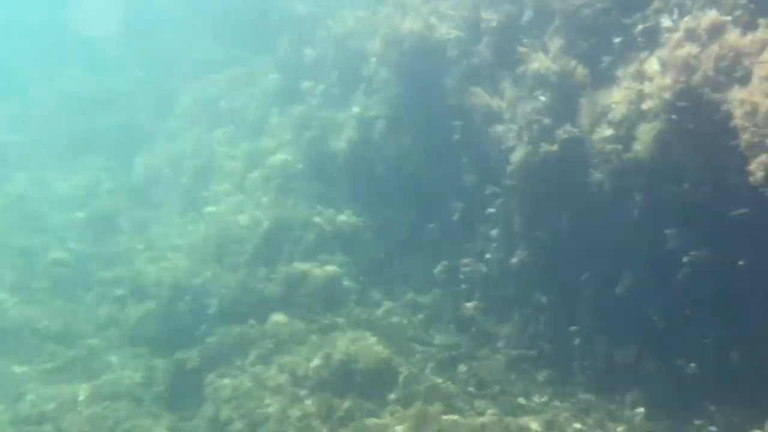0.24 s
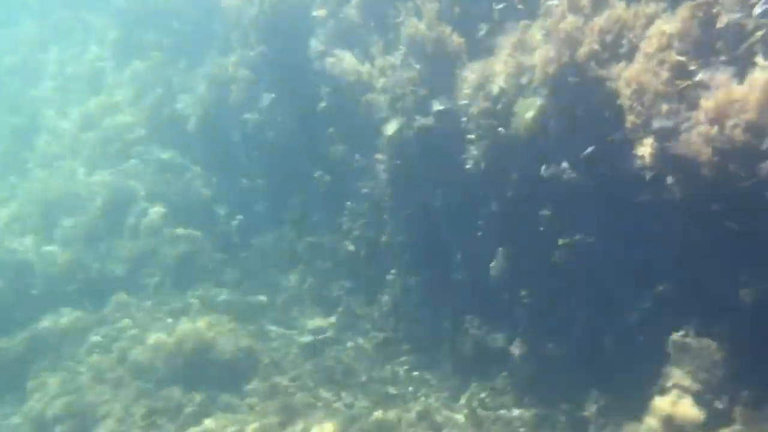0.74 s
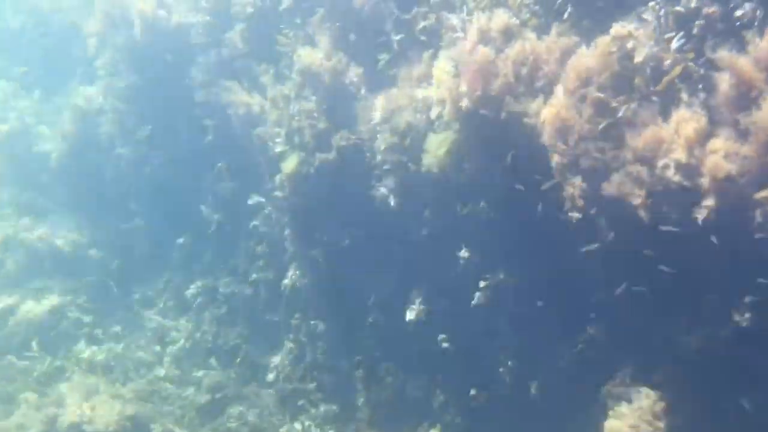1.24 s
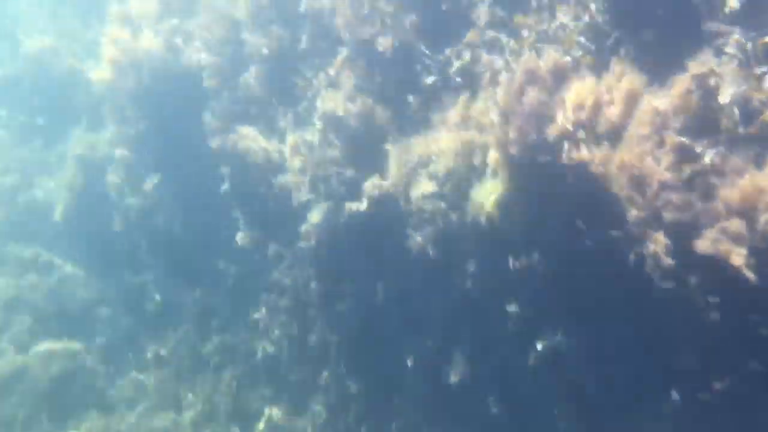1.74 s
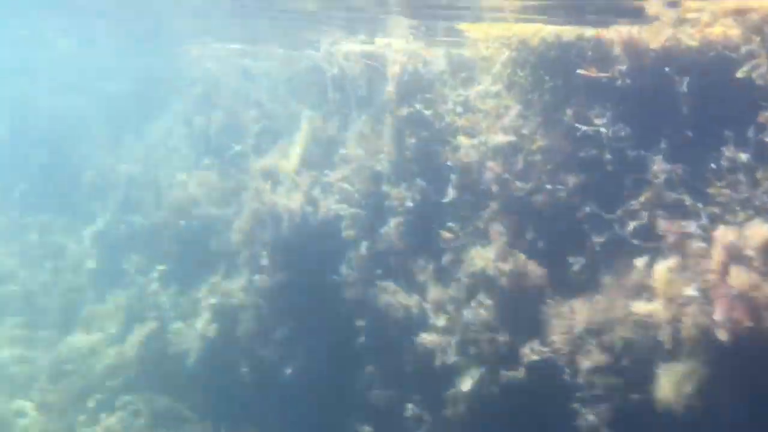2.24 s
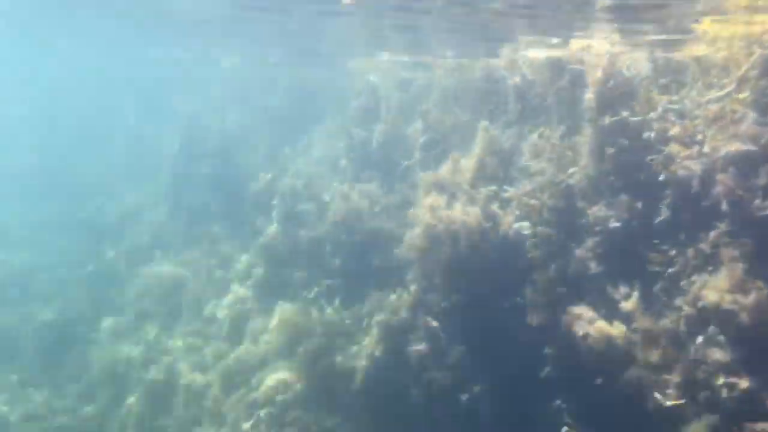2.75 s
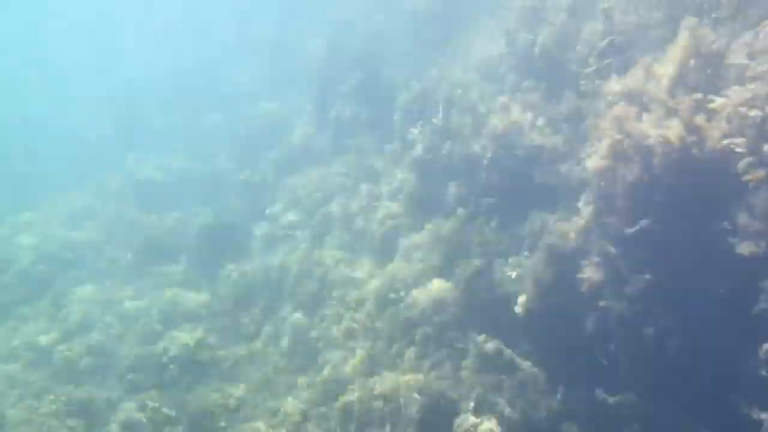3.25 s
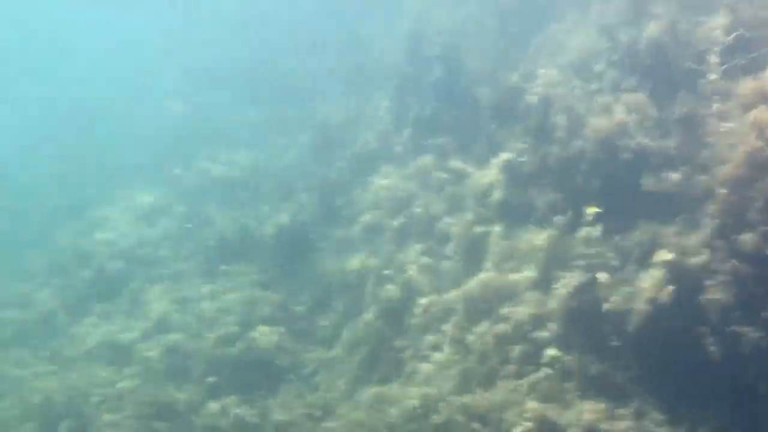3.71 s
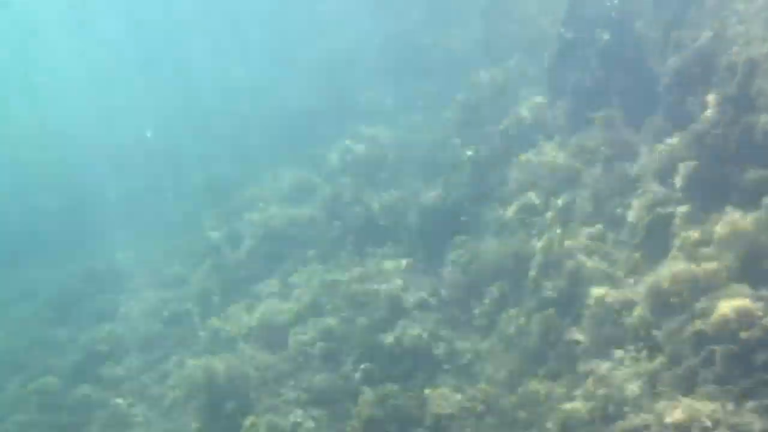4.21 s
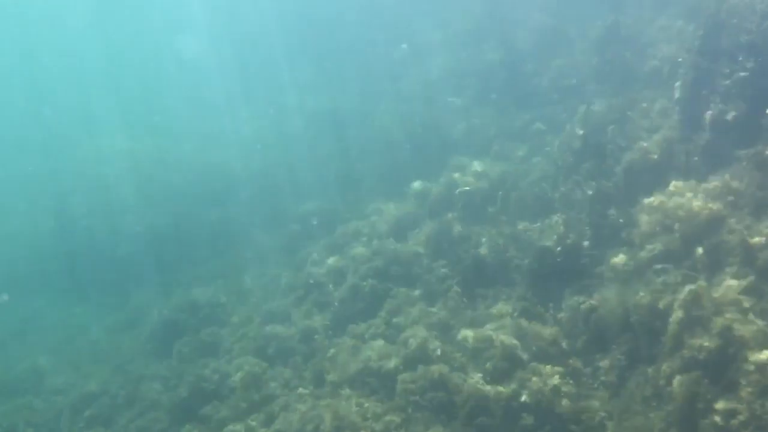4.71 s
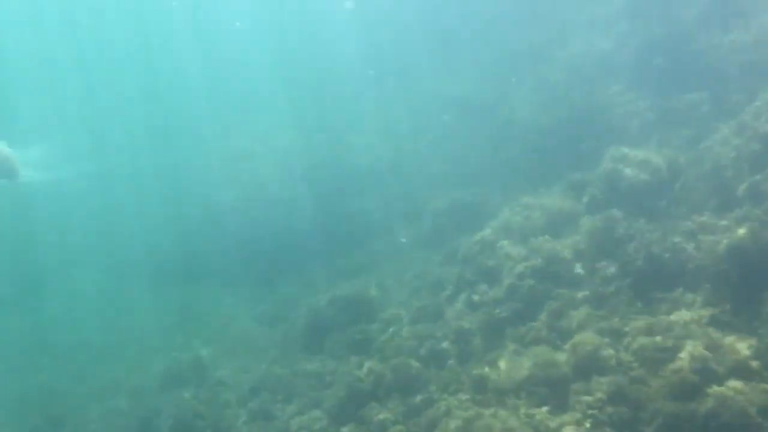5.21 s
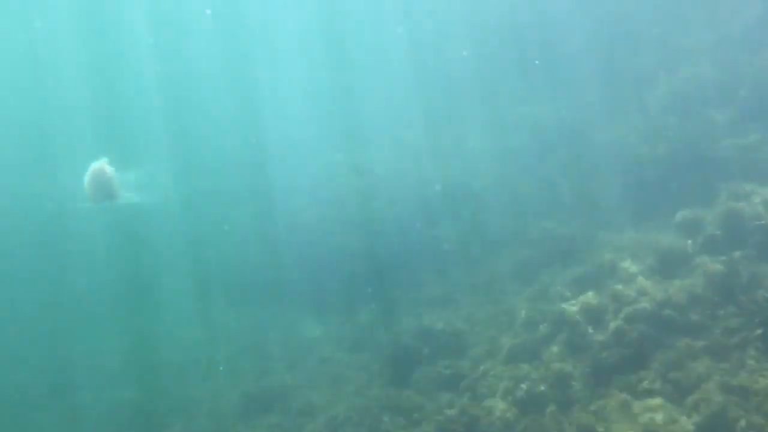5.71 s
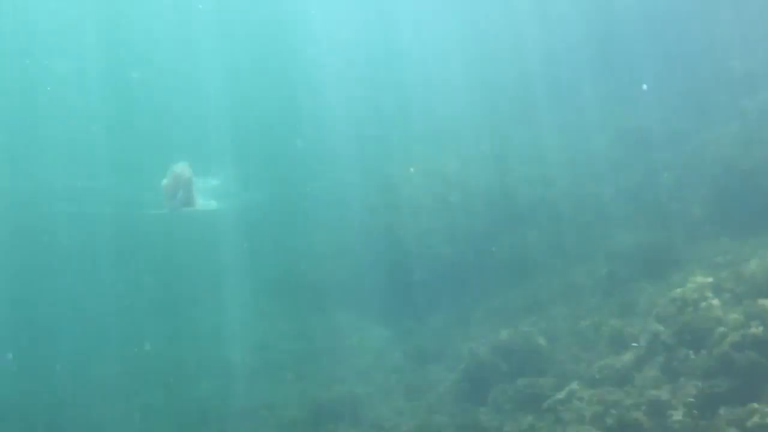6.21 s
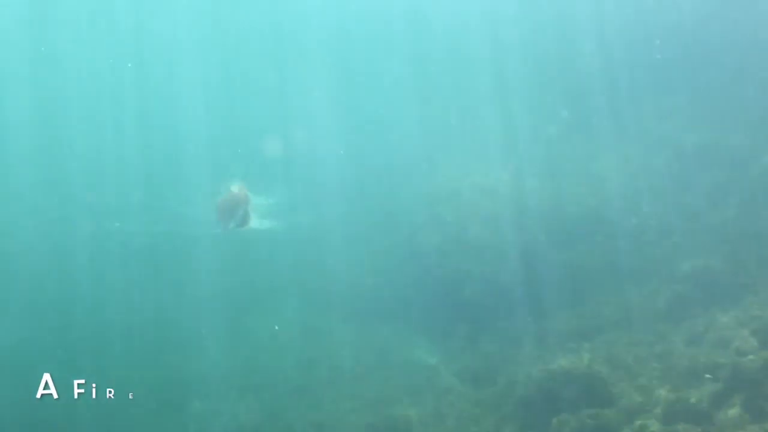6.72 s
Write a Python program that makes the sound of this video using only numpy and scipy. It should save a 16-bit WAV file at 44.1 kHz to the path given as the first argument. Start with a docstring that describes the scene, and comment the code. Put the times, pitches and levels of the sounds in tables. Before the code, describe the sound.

Underwater near a weedy rocky slope, heard from inside a sealed camera housing. Irregular dull low thumps come singly and in clusters over a deep wavering rumble and soft low rush. Faint plasticky ticks and tiny short bubble blips are scattered on top. The strongest knocks fall in the first second or so and around four seconds; after five it grows much calmer. Close, muffled, with very faint hiss.

```python
"""Just under the sea surface, heard from inside a sealed camera housing.
Swirling water nudges the housing: low notes that swell and die make strong thumps, random pushes small ones.
Flow noise makes a deep surge and a rush, and keeps the shell humming in its resonances.
Something small ticks against the shell, with a bounce after each tick, and bubbles ring as short dying notes.
The microphone adds a faint hiss and a very weak, thin tone, and the top of the treble is cut off."""
import sys
import numpy as np
from scipy import signal
from scipy.fft import rfft, irfft
from scipy.io import wavfile

SR = 44100
rng = np.random.default_rng(int(sys.argv[2]) if len(sys.argv) > 2 else 0)


def generate_wav(sig):
    """Save sig (samples, or channels by samples) to the path in sys.argv[1] as 16-bit PCM at SR."""
    pcm = np.round(np.clip(np.atleast_2d(sig).T, -1, 1) * 32767).astype(np.int16)
    wavfile.write(sys.argv[1], SR, pcm)


N = 306936   # length in samples, about 7 s

# Resonances (modes) of the shell in five groups, from low to high:
# pitch_hz, width_hz (basic width), level_db (against the other modes)
LOW_MODES = [(466, 30, -5), (535.3, 61, 1.5), (603.4, 43, -1.5), (643, 240, -5.5)]
MIDDLE_MODES = [(868, 210, 3), (968, 150, 2), (1101.5, 51, -0.5), (1222, 76, -2), (1368, 20, -10),
                (1520, 120, -10.5)]
UPPER_MODES = [(1810, 160, -8.5), (1870, 300, 2), (2050, 46, -0.5), (2270, 230, 0), (2530, 110, -7.5)]
HIGH_MODES = [(2920, 2400, -9), (2970, 130, -6.5), (3200, 460, -1.5), (3780, 720, 5), (4480, 320, -5.5),
              (5050, 690, -11.5)]
TOP_MODES = [(6100, 790, 6.5), (5800, 700, 8), (6870, 580, 4), (7230, 270, 0.5)]


def from_db(db):
    """Turn decibels into a plain multiplier."""
    return 10 ** (np.asarray(db) / 20)


def rms_one(x):
    """Scale a sound to an average strength (rms) of 1."""
    return x / np.sqrt(np.mean(x ** 2) + 1e-20)


def at_hz(points, hz):
    """Read a (pitch, level) curve at any pitch, in straight lines over octaves."""
    point_hz, point_db = np.transpose(points)
    return np.interp(np.log(hz), np.log(point_hz), point_db)


def drift(rate):
    """Slow random wandering of spread 1, with about rate changes a second."""
    step = 40   # samples between the points of the slow curve
    r = np.exp(-2 * np.pi * rate * step / SR)
    noise = rng.standard_normal(N // step + 2002)
    slow = signal.lfilter([1], [1, -2 * r, r * r], noise)[2000:]   # skip the filter's start-up
    return np.interp(np.arange(N) / step, np.arange(len(slow)), rms_one(slow))


def coloured(spectrum):
    """Steady noise whose spectrum has the given shape, at rms 1."""
    hz = np.maximum(np.fft.rfftfreq(N, 1 / SR), 1)
    shaped = rfft(rng.standard_normal(N)) * from_db(at_hz(spectrum, hz))
    return rms_one(irfft(shaped, N))


def resonate(x, hz, width_hz):
    """One resonance: it passes sound near its pitch, with gain 1 at the top."""
    r = np.exp(-np.pi * width_hz / SR)
    top = [(1 - r * r) / 2, 0, (r * r - 1) / 2]
    bottom = [1, -2 * r * np.cos(2 * np.pi * hz / SR), r * r]
    return signal.lfilter(top, bottom, x)


def grains(per_s, spread_db):
    """Random pushes of uneven size and either sign."""
    sizes = from_db(spread_db * np.minimum(rng.exponential(1, N), 5))
    signs = rng.choice([-1, 1], N)
    happens = rng.random(N) < per_s / SR
    return sizes * signs * happens + 1e-18   # the tiny offset avoids pure silence


def add_note(out, start_s, peak_db, hz, t60_s, rise_s, turn, glide=0):
    """Add a sine that swells, then falls 60 dB per t60_s; turn is its starting point in its cycle.

    The pitch glides by glide octaves a second for the first 30 ms, then stays.
    """
    t = np.arange(int(1.1 * t60_s * SR) + 50) / SR
    shape = (1 - np.exp(-(t / rise_s) ** 2)) * from_db(-60 * t / t60_s)
    cycles = np.cumsum(hz * 2 ** (glide * np.minimum(t, 0.03))) / SR
    note = from_db(peak_db) * shape / shape.max() * np.sin(2 * np.pi * (cycles + turn))
    first = round(start_s * SR)
    out[first:first + len(t)] += note[:N - first]


def strike(out, start_s, peaks_db, modes, length, swell_cycles):
    """A blow rings every mode with a chance strength and phase; narrow modes ring longer."""
    for (hz, width_hz, level_db), peak_db in zip(modes, peaks_db):
        mode_db = peak_db + level_db - 4.5 + rng.normal(0, 1.3)
        t60_s = length * 3.52 / width_hz
        add_note(out, start_s, mode_db, hz, t60_s, swell_cycles / hz, rng.random())


def fizz(level_db):
    """Clumps of tiny bubbles ring briefly, in 20 pitch bands; smaller bubbles ring higher."""
    out = np.zeros(N)
    clumps = from_db(7.1 * drift(rate=7.2))
    for hz in np.geomspace(800, 2750, 20):
        born = grains(per_s=40 * clumps, spread_db=2.2)
        ringing = resonate(resonate(born, hz, width_hz=110.0), hz, width_hz=160.0)
        # higher bands are fainter, but those above 2300 Hz get a lift
        band_db = -6.0 * np.log2(hz / 2000) + 2.6 * (hz > 2300)
        out += from_db(band_db) * rms_one(ringing)
    return from_db(level_db) * out


def wash(modes, level_db, patchy_db):
    """Flow noise keeps a group of shell modes sounding, each swelling and fading in patches."""
    out = np.zeros(N)
    together = drift(rate=12.0)   # a wandering that the whole group shares
    for hz, width_hz, mode_db in modes:
        hum_width_hz = 1.4 * width_hz
        hum = resonate(resonate(rng.standard_normal(N), hz, hum_width_hz), hz, hum_width_hz)
        patches_db = patchy_db * (0.98 * together + drift(rate=42.0))
        out += from_db(mode_db + patches_db) * rms_one(hum)
    return from_db(level_db) * rms_one(out)


def shell_hum(low_db, middle_db):
    """All five groups of shell modes hum in the flow; the two lowest follow the moving water."""
    hum = wash(LOW_MODES, low_db, patchy_db=2.5)
    hum += wash(MIDDLE_MODES, middle_db, patchy_db=2.5)
    hum += wash(UPPER_MODES, level_db=-84.5, patchy_db=2.5)
    hum += wash(HIGH_MODES, level_db=-80, patchy_db=0.25)
    hum += wash(TOP_MODES, level_db=-85.5, patchy_db=-0.2)
    return hum


def water_rush(level_db):
    """The rush of moving water: noise mostly between 250 and 350 Hz, with an unsteady level."""
    # shape of the rush's spectrum: pitch_hz, level_db (per Hz, relative)
    rush_spectrum = [(200, -32), (250, -1.5), (320, 2), (350, -8), (400, -18.5), (480, -25), (700, -74.5)]
    return from_db(level_db + 1.7 * drift(rate=14.0)) * coloured(rush_spectrum)


def deep_surge(level_db):
    """The deep surge of the water: noise mostly between 48 and 110 Hz, with an unsteady level."""
    # shape of the surge's spectrum: pitch_hz, level_db (per Hz, relative)
    surge_spectrum = [(8.8, -52), (15, -24), (48, 3.5), (110, 1.5), (140, -29), (240, -120)]
    return from_db(level_db + 2.5 * drift(rate=16.0)) * coloured(surge_spectrum)


def clear_bubbles():
    """The clearest small bubbles: each rings as one sine that swells and dies."""
    # bubbles: start_s, peak_db, pitch_hz, t60_s (time to fall by 60 dB)
    bubble_table = [(0.066, -45, 766, 0.011), (0.169, -56, 1990, 0.017), (0.226, -69, 2368, 0.049),
                    (0.255, -67.5, 2700, 0.043), (0.321, -56, 1204, .05), (0.529, -68, 2627, 0.056),
                    (0.565, -71, 2600, .05), (0.769, -54, 1600, 0.024), (0.957, -45, 788, 0.021),
                    (1.115, -46, 602, 0.029), (1.251, -69, 2480, 0.064), (1.361, -65, 2430, 0.032),
                    (1.962, -50, 810, 0.052), (2.133, -56, 1981, 0.017), (2.182, -69, 2110, 0.055),
                    (2.383, -70, 2282, .06), (2.96, -69, 2000, 0.042), (2.991, -77, 2220, 0.055),
                    (3.026, -59, 1500, 0.067), (3.213, -49.5, 558, 0.2), (3.367, -61.5, 1480, 0.035),
                    (3.503, -63, 1520, 0.049), (3.523, -64, 2090, 0.043), (3.827, -42, 505, 0.013),
                    (4.011, -67, 2325, 0.048), (4.295, -55.5, 1480, 0.023), (4.374, -74, 2670, 0.071),
                    (4.56, -48, 853, 0.02), (4.777, -56, 1390, 0.079), (4.865, -40, 520, 0.083),
                    (4.963, -60, 1410, 0.034), (5.018, -46, 668, 0.033), (5.04, -46.5, 602, 0.069),
                    (5.684, -70, 2497, .05), (5.712, -73, 2368, .05), (5.808, -69, 1880, 0.067)]
    out = np.zeros(N)
    for start_s, peak_db, hz, t60_s in bubble_table:
        add_note(out, start_s, peak_db, hz, t60_s, rise_s=7.8 / hz + 0.0043, turn=0)
    return out


def shell_ticks():
    """Something small ticks on the shell: it rings itself, rings the shell, and bounces once."""
    # ticks: start_s, level_db (base level), own_pitch_hz (of the ticking thing),
    # fall_below and fall_above (dB per octave away from that pitch),
    # ring_length (1 = usual), top_lift_db (for the modes above 4 kHz)
    tick_table = [(0.1279, -58, 2490, -5, 7, 0.79, -5.5), (0.157, -55, 1270, -8, 6, 0.76, -4),
                  (0.273, -50, 600, 12.5, 9, .9, -8), (0.654, -68.5, 2900, 11, 9, .8, -9),
                  (0.686, -67, 3110, 7.5, 11.5, 0.65, -7), (0.702, -69, 3230, 9, 9, 0.67, -6),
                  (0.851, -39.5, 610, -1, 11.5, 0.36, -1.5), (1.095, -47.5, 845, -3.5, 21, 0.84, -4),
                  (1.2895, -48, 595, 8, 14, 1.7, -8), (1.557, -51.5, 606, 3, 3.5, 0.57, -2),
                  (1.9062, -46, 2370, -7, 11, .4, -7.5), (1.908, -40.5, 1680, -8, 25, 0.35, -10.5),
                  (1.9438, -47.5, 610, 6, 8.5, 1, -6), (2.0684, -54.5, 690, 1, 31, 1, -3),
                  (2.134, -64, 1990, -6.5, 21, 0.64, 1.5), (2.594, -37.5, 1383, 4, 16, 0.65, 18),
                  (3.0509, -39.5, 2124, 8, 4, 0.78, -13.5), (3.197, -49.5, 600, 7, 16, 0.8, 1),
                  (3.7455, -44, 620, 13, 9, 0.5, -6), (3.8686, -39.5, 1920, 9.5, 19, 0.34, 15),
                  (3.897, -43.5, 1900, 13, 24, 0.38, 12), (3.9206, -66, 3100, 4, 21, .9, 4),
                  (3.9736, -45, 2250, 6, 8.5, 0.61, 7.5), (4.1644, -44.5, 615, 12, 14.5, 1.2, 0),
                  (4.2, -42, 612, 3, 19, 1, -9), (4.207, -59.5, 1285, 2, 2, 0.43, -17),
                  (4.4203, -47, 600, 0, 12, .9, -3), (4.458, -64, 2600, -6.5, 25, 1.3, -4),
                  (5.0213, -38.5, 654, -5, 22, 1, -4), (6.3465, -50, 810, 0, 6, 1, -5),
                  (6.3505, -53, 2620, 7, 21, 1, 3), (6.3525, -51.5, 1485, -3, 22, .9, -4)]
    swell_cycles = 1.9
    shell = LOW_MODES + MIDDLE_MODES + UPPER_MODES + HIGH_MODES + TOP_MODES
    mode_hz = np.array(shell)[:, 0]
    bright = mode_hz > 4000
    out = np.zeros(N)
    for start_s, level_db, own_hz, fall_below, fall_above, length, top_lift_db in tick_table:
        octaves = np.log2(mode_hz / own_hz)
        fall_db = np.where(octaves > 0, fall_above, -fall_below) * octaves
        peaks_db = level_db - fall_db + top_lift_db * bright
        add_note(out, start_s, level_db + 3, own_hz, length * 0.033, swell_cycles / own_hz, rng.random())
        strike(out, start_s, peaks_db, shell, length, swell_cycles)
        # a weaker, duller bounce 5 to 10 ms later
        bounce_s = start_s + rng.uniform(0.0049, 0.0095)
        strike(out, bounce_s, peaks_db - 11.5 - 9.0 * bright, shell, length, swell_cycles)
    return out


def small_thumps(level_db):
    """Eddies push the housing at random; each push rocks it for a few cycles at its own pitch."""
    # loudness of the small thumps by pitch: pitch_hz, level_db (relative)
    thump_spread = [(80, -7.5), (97, -11), (129, 5.5), (160, -0.5), (189, 2.5), (227, -2.5), (260, -22.5)]
    out = np.zeros(N)
    for hz in np.geomspace(85, 255, 11):
        width_hz = hz / 6.62
        pushes = grains(per_s=30.0, spread_db=3.0)
        rocking = resonate(resonate(pushes, hz, width_hz), hz, width_hz)
        out += from_db(at_hz(thump_spread, hz)) * np.sqrt(width_hz) * rms_one(rocking)
    return from_db(level_db + 1.0) * rms_one(out)


def strong_thumps():
    """Strong nudges of water: a low gliding note, then a dull knock in the low shell modes."""
    # thumps: start_s, peak_db, start_pitch_hz, glide (octaves per s), t60_s (time to fall by 60 dB)
    thump_table = [(0.051, -19.5, 180, -42, 0.034), (0.265, -10, 171, 24.5, 0.058),
                   (0.309, -12.5, 184, 5.5, .056), (0.324, -14, 163.7, -12.5, .18),
                   (0.445, -28, 148.4, -12, 0.13), (0.601, -17.5, 202, -5, 0.037),
                   (0.721, -24, 191, 14.5, 0.046), (0.801, -25.5, 171, -25, 0.043),
                   (0.847, -7, 173.4, 19.5, 0.027), (0.88, -21.5, 169.4, -4.5, 0.36),
                   (1.126, -10.5, 186, -27.5, 0.033), (1.229, -19.5, 150, -11.5, 0.03),
                   (1.5, -23, 119.7, 19, 0.069), (1.56, -15, 127.8, 36.5, 0.11),
                   (1.638, -22.5, 193.6, -16, 0.16), (1.718, -23, 235.8, -25, 0.22),
                   (1.748, -18, 169.6, 0, 0.1), (1.833, -20, 130.6, 13, 0.043), (1.891, -23, 147, 2, 0.12),
                   (1.926, -17.5, 172.5, 28, 0.041), (1.95, -18, 169, 11, 0.035),
                   (2.164, -22.5, 185, -48.5, 0.11), (2.494, -25.5, 140, -1.5, 0.14),
                   (2.609, -20.5, 143, -30, 0.053), (2.766, -16.5, 205, -41.5, 0.051),
                   (2.802, -17.5, 183, -39, 0.14), (2.908, -13.5, 197, -10.5, 0.066),
                   (3.105, -26.5, 157, -1.5, 0.16), (3.218, -14.5, 158.5, 8.5, 0.027),
                   (3.435, -10, 148, 24.5, 0.047), (3.748, -20, 132.6, 43, 0.031),
                   (3.784, -19, 136, -28, 0.049), (4.018, -11.5, 173, 14, 0.074),
                   (4.195, -9.5, 168.2, 8, 0.12), (4.31, -21.5, 243, -14, 0.12),
                   (4.419, -20.5, 216.3, -0.4, 0.18), (4.607, -16, 159, 9, 0.058),
                   (4.793, -19, 226, -2, 0.035), (4.96, -24.5, 184, -1, 0.033),
                   (5.536, -25.5, 129, -28, .065), (5.742, -20, 157, -20, 0.026),
                   (5.77, -22.5, 171, -43, 0.021), (5.831, -20.5, 147, 23, 0.031),
                   (6.164, -26.5, 146, 26.5, 0.033), (6.349, -21.5, 165.6, 5.5, 0.093),
                   (6.693, -17, 158, 16.5, 0.05), (6.826, -26.5, 139, -3.5, 0.11)]
    out = np.zeros(N)
    for start_s, peak_db, hz, glide, t60_s in thump_table:
        add_note(out, start_s, peak_db, hz, t60_s, rise_s=0.006, turn=rng.random(), glide=glide)
        knock_db = np.full(len(LOW_MODES), peak_db - 42.5)
        strike(out, start_s + 0.0028, knock_db, LOW_MODES, length=0.63, swell_cycles=0.62)
    return out


def scene():
    """The water and the shell together, as one channel."""
    # moving water, joined by straight lines: time_s, small_thumps_db (base level), surge_db, rush_db,
    # low_wash_db (in the low shell modes), middle_wash_db (in the middle shell modes)
    water_table = [(0.0, -33, -33, -55, -62.5, -63.5), (0.25, -35, -37.5, -44.5, -57, -60.5),
                   (0.75, -30, -37.5, -45, -58.5, -62), (1.43, -38, -39, -59.5, -66, -65),
                   (1.72, -38.5, -39.5, -49, -61, -63), (1.84, -41, -30.5, -48.5, -63, -64),
                   (2.23, -34, -38.5, -52, -59.5, -63.5), (2.89, -35.5, -38, -49, -61, -65),
                   (3.02, -32.5, -37, -51.5, -55, -61.5), (3.61, -40, -37.5, -59.5, -68.5, -66.5),
                   (3.97, -36.5, -36.5, -64, -63.5, -63), (4.11, -35.5, -46, -49, -63.5, -62.5),
                   (4.21, -37.5, -35, -46.5, -59, -65.5), (4.63, -32, -43, -41.5, -56, -63),
                   (4.9, -33.5, -35.5, -40.5, -60.5, -64.5), (5.7, -45, -42.5, -59, -79.5, -66),
                   (5.74, -41, -30, -54.5, -81, -65), (5.99, -46.5, -42, -79, -82.5, -67.5),
                   (6.05, -42, -35.5, -62.5, -78, -66.5), (6.38, -39.5, -42, -48.5, -71, -66.5),
                   (6.94, -36.5, -40, -52, -69, -67), (6.96, -39, -49, -53, -68, -68)]
    time_s, *columns = np.transpose(water_table)
    t = np.arange(N) / SR
    thump_db, surge_db, rush_db, low_db, middle_db = [np.interp(t, time_s, c) for c in columns]
    # the fizz follows about a third of the low wash's swing
    fizz_db = -90 + 0.32 * (low_db - low_db.mean())
    background = fizz(fizz_db) + shell_hum(low_db, middle_db)
    water = water_rush(rush_db) + deep_surge(surge_db)
    details = clear_bubbles() + shell_ticks()
    thumps = small_thumps(thump_db) + strong_thumps()
    return (background + water + details + thumps)[None]


def record(dry):
    """The microphone adds noise and a thin electronic tone; a steep filter cuts the top."""
    # shape of the hiss's spectrum: pitch_hz, level_db (per Hz, relative)
    hiss_spectrum = [(1000, -8), (7000, -2.5), (9000, -3), (10300, -9), (11000, -6.5), (15000, -5.5)]
    hiss = from_db(-82) * coloured(hiss_spectrum)
    whine = from_db(-107) * np.sin(2 * np.pi * 12042 * np.arange(N) / SR)
    # at least 30 dB down from 15050 Hz upwards
    top_cut = signal.cheby2(24, 30, 15050, fs=SR, output="sos")
    return signal.sosfilt(top_cut, dry + hiss + whine)


dry = scene()
out = record(dry)
generate_wav(out)
```